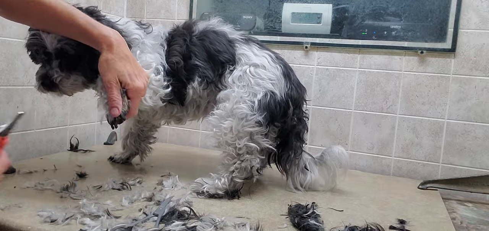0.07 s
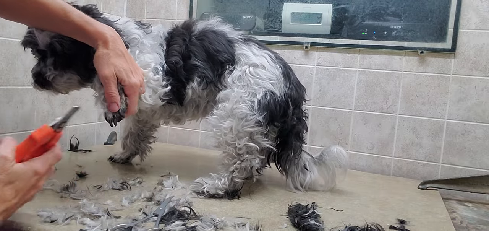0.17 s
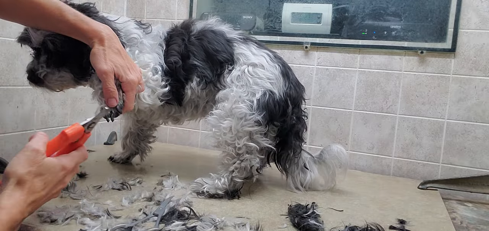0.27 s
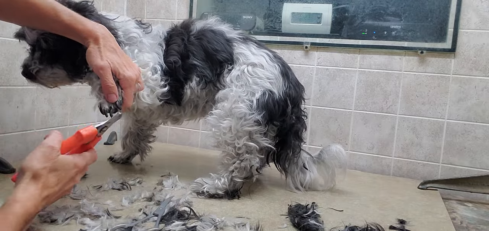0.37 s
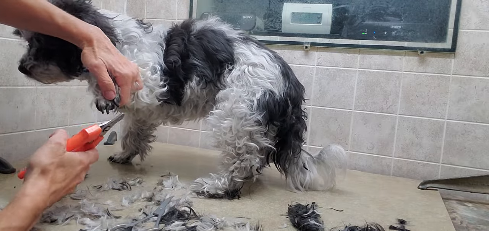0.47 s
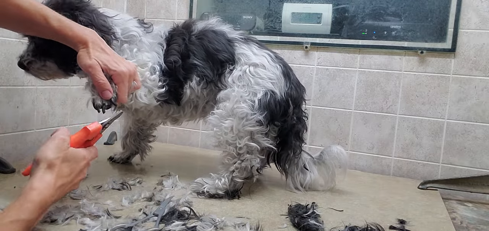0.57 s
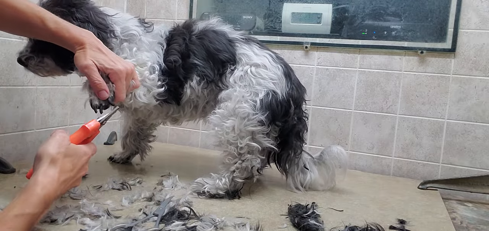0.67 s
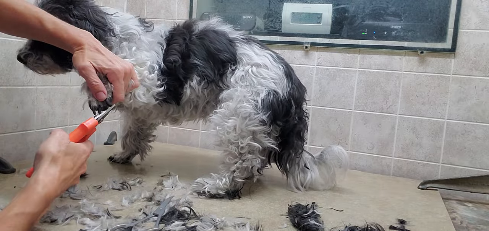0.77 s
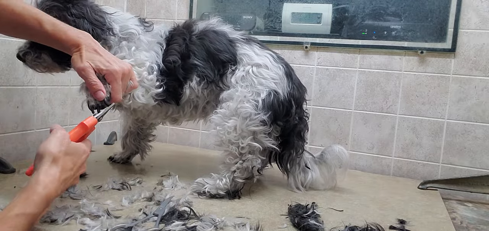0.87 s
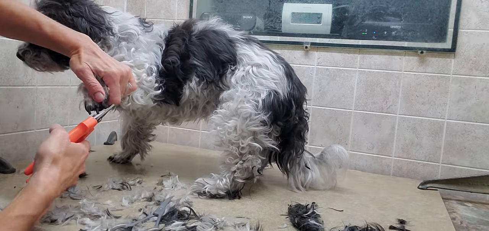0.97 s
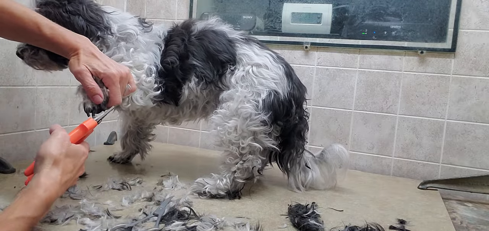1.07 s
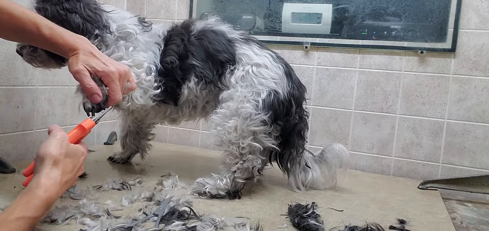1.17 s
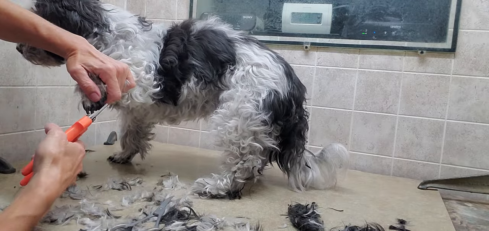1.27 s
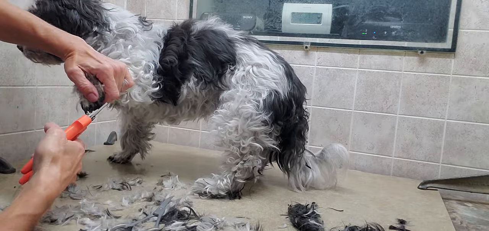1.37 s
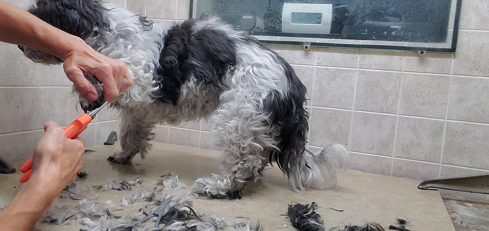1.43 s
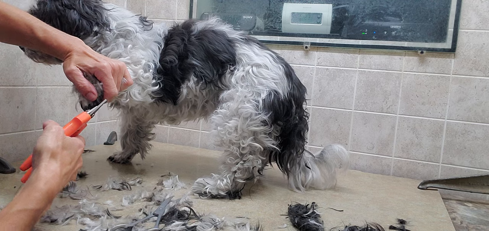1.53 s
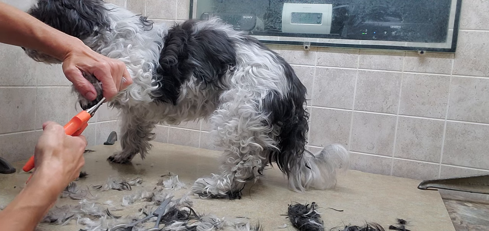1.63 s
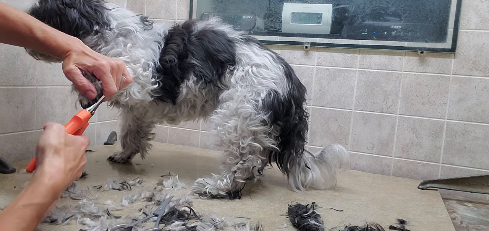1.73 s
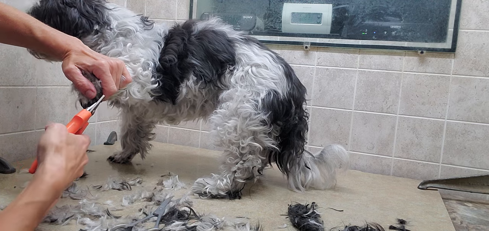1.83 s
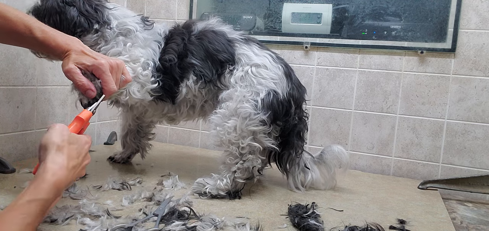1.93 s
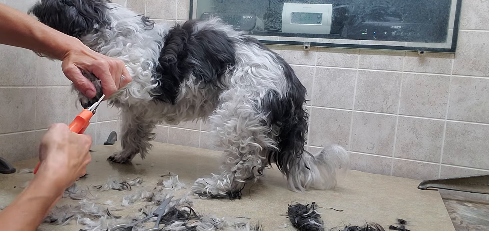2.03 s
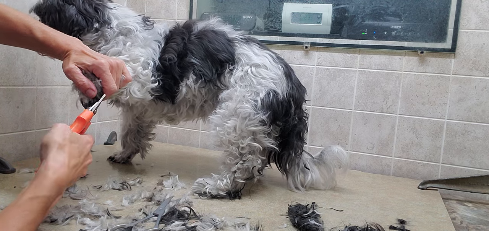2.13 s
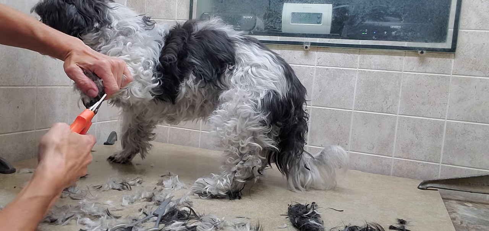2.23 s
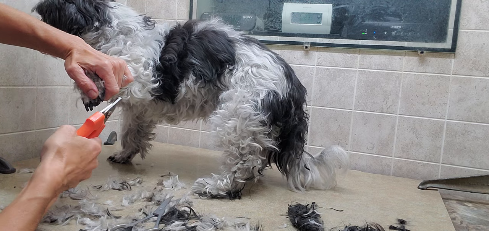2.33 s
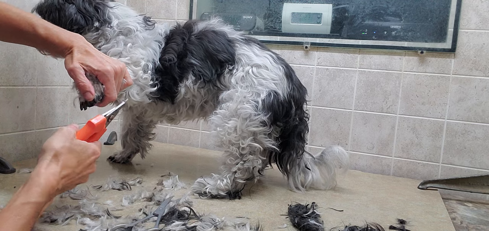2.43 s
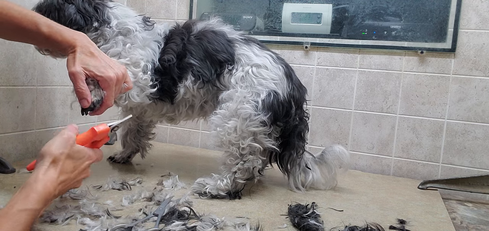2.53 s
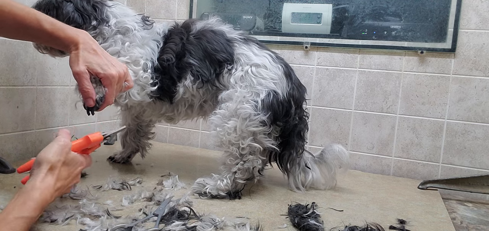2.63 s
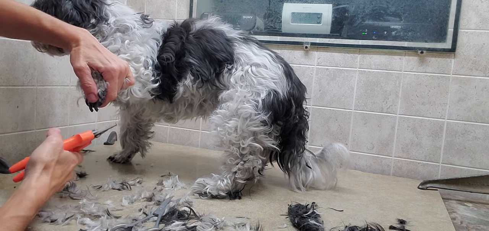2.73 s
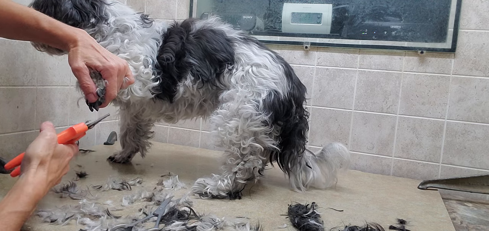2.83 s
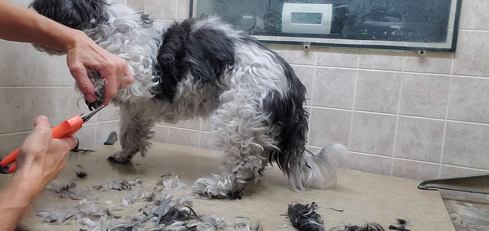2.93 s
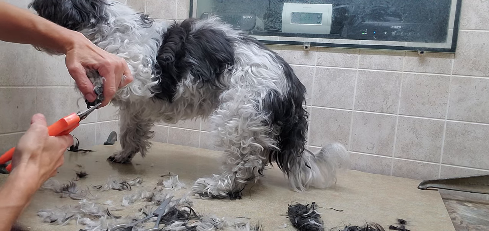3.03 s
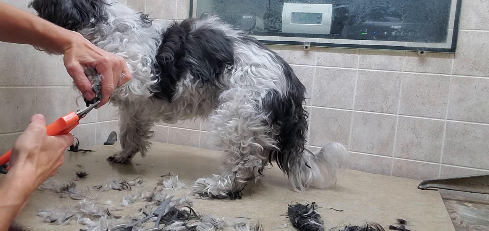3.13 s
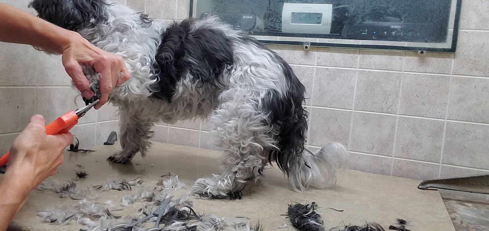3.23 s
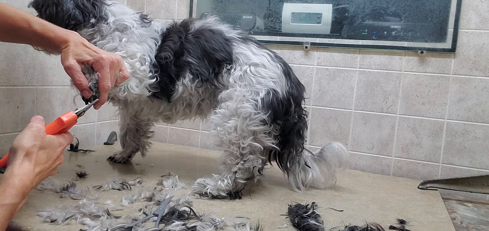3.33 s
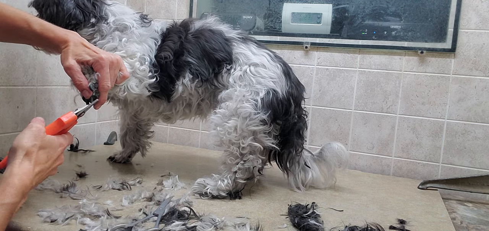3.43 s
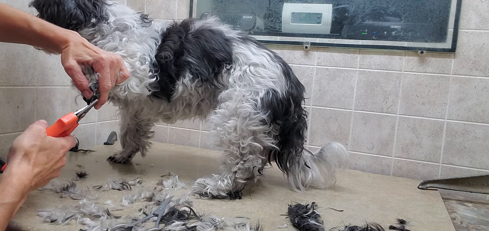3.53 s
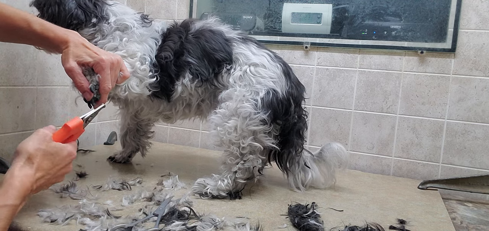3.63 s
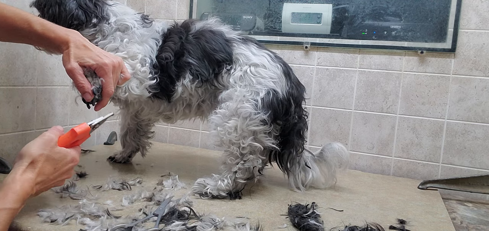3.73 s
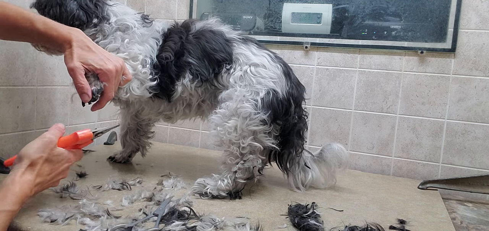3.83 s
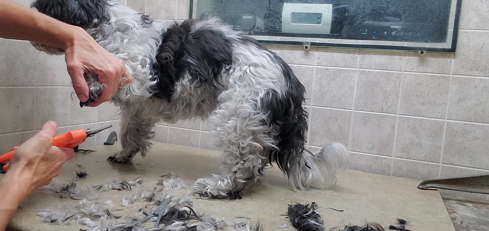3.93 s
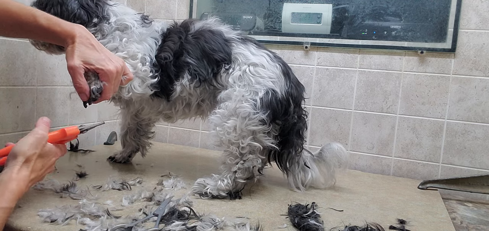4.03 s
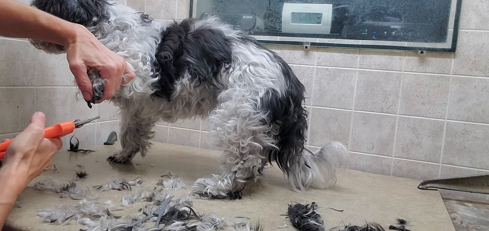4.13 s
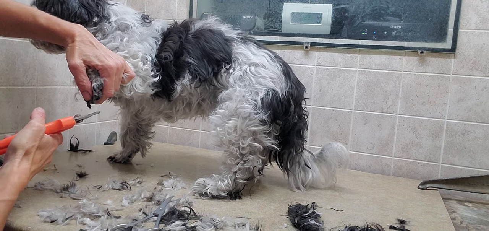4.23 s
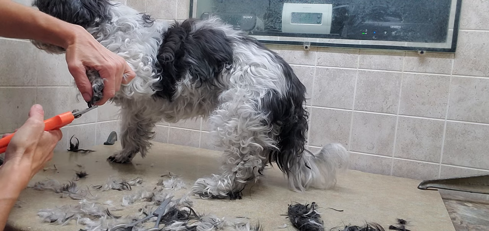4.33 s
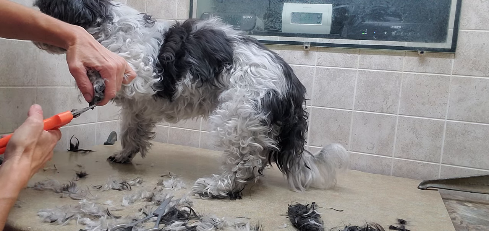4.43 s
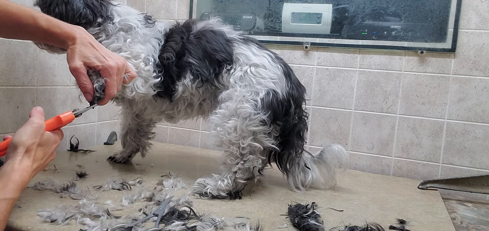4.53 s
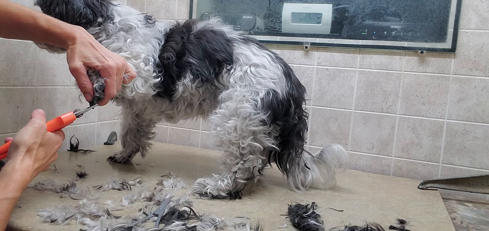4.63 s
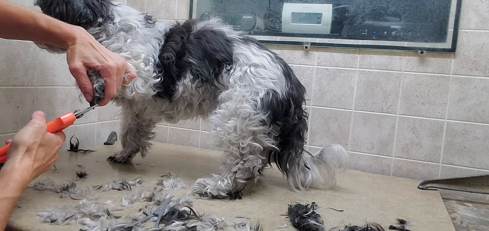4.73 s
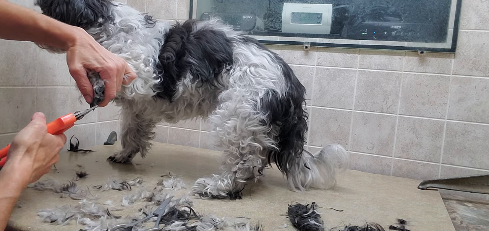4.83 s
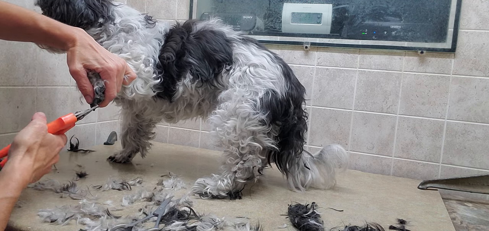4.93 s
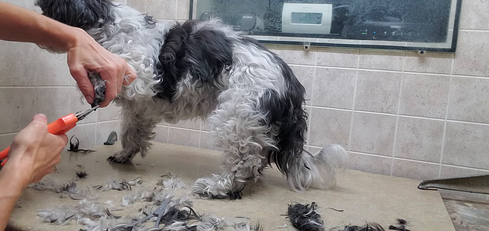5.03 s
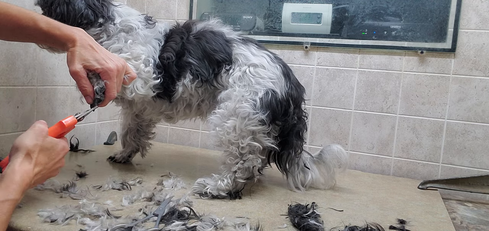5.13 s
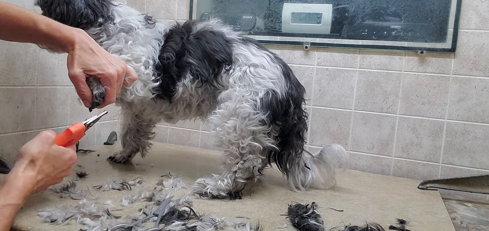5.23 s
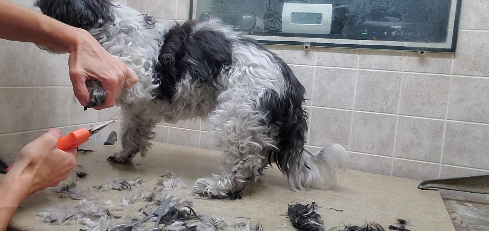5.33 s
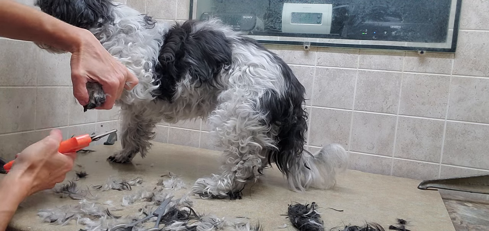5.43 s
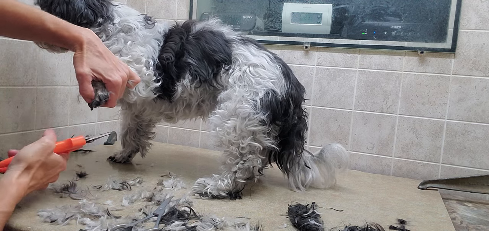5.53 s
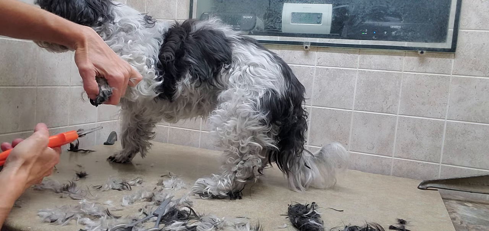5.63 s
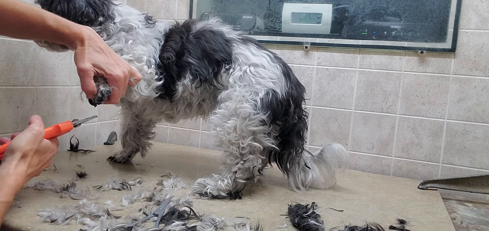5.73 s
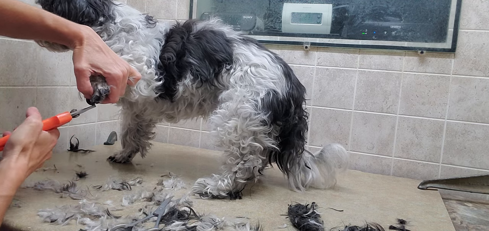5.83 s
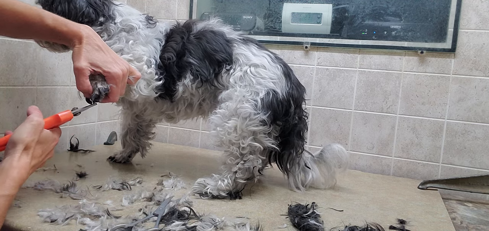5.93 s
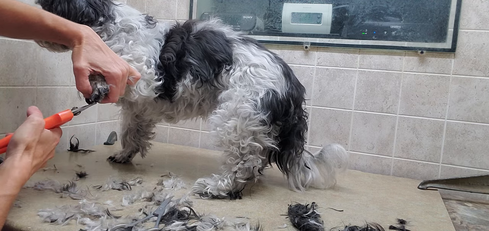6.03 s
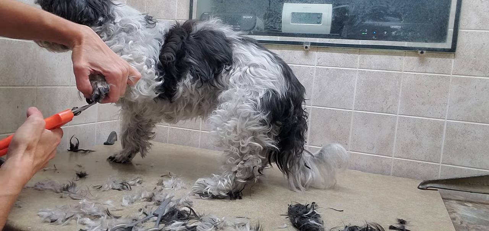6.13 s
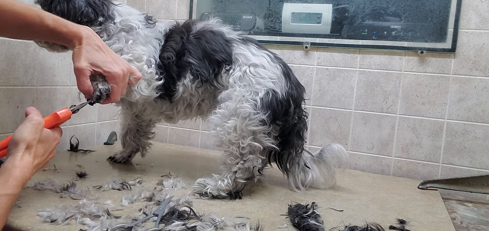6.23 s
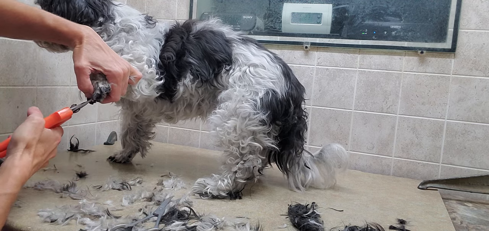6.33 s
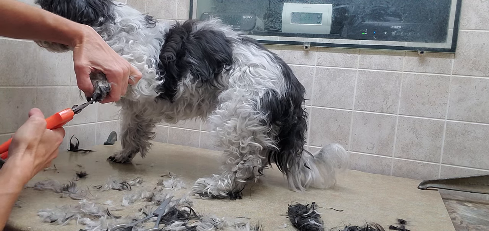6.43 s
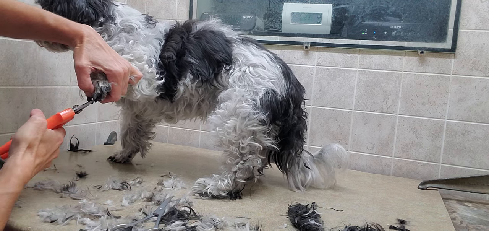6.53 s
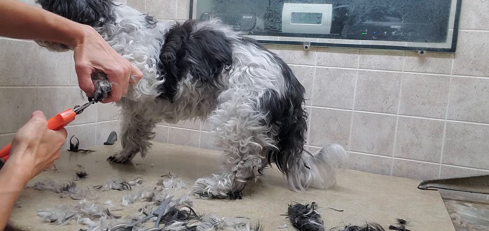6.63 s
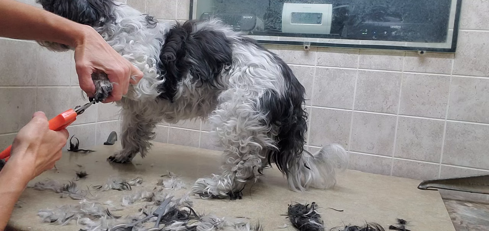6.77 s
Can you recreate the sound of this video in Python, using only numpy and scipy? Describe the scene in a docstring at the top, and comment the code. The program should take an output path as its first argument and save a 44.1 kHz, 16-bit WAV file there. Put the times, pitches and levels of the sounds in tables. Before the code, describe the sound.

A close stereo view of nail clipping in a small, hard tiled tub, with very quiet duct rumble, fan hum and thin hiss throughout; the rumble swells gently around 3.2 s. At 0.03 s there is a light metallic tap and soft fur rustle, stirring again at 0.4 s. Near-silence follows, with barely audible blade rubbing from 1 to 1.5 s and a faint paw bump at 1.24. A crisp crack at 2.32 leads to a loud snap at 2.36, a handle knock at 2.48 with faint spring ringing, then a tick and low paw bumps near 2.7. A smaller crack precedes the softer second snap at 3.68; knocks follow at 3.8-4.0, with blades sliding and fur brushing. A tiny creak swells into the brightest, loudest snap at 5.22, then a strong knock at 5.28, weaker clicks to 5.45, and ticks at 5.63, 5.7 and 5.93. Tile echoes die quickly; only ventilation remains until about 7 s.

```python
"""Plier-style clippers cut three of a small dog's nails in a tiled grooming tub, heard by two microphone ports.
Each nail creaks or cracks, then breaks in a shower of splinters, and the jaws slam shut and ring.
Handles knock, light taps and hinge ticks sound, noise rubs as blades slide, and mode clusters ring as the spring.
Every click is answered by slaps off the tiles, a dense tail and standing waves.
Behind lie low paw bumps, a hand brushing through the coat, and ventilation rumble, fan tones and hiss."""
import sys
import numpy as np
from scipy import signal
from scipy.fft import rfft, irfft, next_fast_len
from scipy.io import wavfile
from scipy.ndimage import map_coordinates

SR = 44100
rng = np.random.default_rng(int(sys.argv[2]) if len(sys.argv) > 2 else 0)


def dump_mix(stems):
    """Bounce the given channels to the path in sys.argv[1] as a 16-bit WAV at rate SR."""
    frames = np.atleast_2d(stems).T  # one column per channel
    limited = np.clip(frames, -1, 1)  # hard clip at full scale
    pcm = np.round(limited * 32767).astype(np.int16)
    wavfile.write(sys.argv[1], SR, pcm)


N = 299880  # length in samples

# Colour of the duct rumble. Each row: frequency in Hz, relative level in dB per Hz.
RUMBLE_COLOUR = [(12, -40.5), (20, -10.5), (65, 2), (83, -7.5), (101, -14.5), (153, -5.5), (187, -23.5),
                 (221, -6), (254, -17), (419, -29), (469, -24.5), (1020, -38.5), (2960, -47), (6840, -55),
                 (15800, -45.5)]
# Left-right likeness of the ventilation noise. Each row: frequency in Hz, correlation from -1 to 1.
AIR_ALIKE = [(60, 0.92), (180, 0.76), (550, 0.62), (1650, -0.03), (4970, -0.4), (15000, 0.39)]
# Fan tones. Each row: frequency in Hz, level in dB.
FAN_TONES = [(75, -73.5), (151, -79.5), (221, -84.5)]
RUMBLE_DB, RUMBLE_DRIFT_DB = -67, 0.9  # level of the duct before its swell, and its slow drift
RUMBLE_SWELL_S, RUMBLE_SWELL_WIDTH_S, RUMBLE_SWELL_DB = 3.2, 0.79, 4  # the rumble grows for a while

# Colour of the hand in the coat. Each row: frequency in Hz, relative level in dB per Hz.
RUSTLE_COLOUR = [(100, -12.5), (400, -1.5), (800, -2), (1500, -12), (4000, -15), (8000, -26), (14500, -14)]
# The hand strokes through the coat. Each row: time at the fullest in seconds, level in dB.
STROKES = [(.03, -67), (.37, -74), (1.28, -79.5), (2.699, -82), (4.1, -73)]
STROKE_RISE_DB_PER_S, STROKE_FALL_DB_PER_S = 70.5, 54  # every stroke swells and fades alike
HOLD_DB = -84.5  # the coat stirs under the resting hand

# Soft bumps of the paws on the tub floor. Each row: start in seconds, level in dB, pitch in Hz.
PAWS = [(1.24, -68, 340), (2.703, -61.5, 457), (2.722, -54, 222.4), (2.725, -65, 395), (4.016, -57, 467),
        (5.45, -70, 489.5)]

# Decay of the tub's echo. Each row: frequency in Hz, time to fall by 60 dB in seconds.
TUB_T60 = [(100, 0.45), (400, 0.31), (1500, .24), (4000, .24), (9000, .24), (15000, 0.18)]
# Left-right likeness inside the tub. Each row: frequency in Hz, correlation from -1 to 1.
TUB_ALIKE = [(100, 0.66), (300, 0.06), (600, 0.25), (2000, -0.06), (5000, 0)]
# Standing waves in the air between the walls. Each row: frequency in Hz, relative level in dB.
TUB_MODES = [(222, -6.5), (329, 1.5), (484, 2.5), (609, -3), (732, -0.5), (797, -3.5), (965, -4.5)]
# Colour of the dense tail, outweighed by standing waves in the bass. Each row: frequency in Hz, gain in dB.
TAIL_COLOUR = [(150, -4.5), (330, -8), (600, -2.5), (1200, -3)]
# Difference between the two microphone ports. Each row: frequency in Hz, left minus right in dB.
PORTS = [(200, -0.5), (550, 4), (1200, 2.5), (2500, 2), (4000, 2), (5600, 1.5), (7300, 10.5), (9300, 1.5),
         (12000, 1), (15000, 13)]
TOP_HZ = 15900  # band limit

# The return spring is set ringing. Each row: start in seconds, level in dB, pitch in Hz.
SPRING = [(2.492, -70.5, 6040), (2.67, -73, 5580), (3.91, -71.5, 6530), (4.11, -80.5, 6160),
          (5.45, -76, 6545), (5.70, -78, 5646)]
# The blades slide over each other as they are positioned or opened.
# Each row: start in seconds, length in seconds, level in dB.
BLADE_SLIDES = [(0.998, 0.51, -81), (2.598, .36, -73.5), (3.95, 0.44, -73)]
# Colour of the sliding blades. Each row: frequency in Hz, relative level in dB per Hz.
SLIDE_COLOUR = [(1000, -17), (3500, -5), (6300, -2.5), (8500, -11), (11000, -1), (14500, -1.5)]

# Light taps and hinge ticks of the clippers.
# Each row: start in seconds, level in dB, treble in dB, left minus right in dB.
TICKS = [(.029, -47.5, 7, 0.5), (2.668, -61.5, 2, 5), (3.045, -72.5, 10, 1), (4.167, -67, 21, 3),
         (4.396, -73.5, 15, 7), (5.628, -50.5, 9.5, 2.5), (5.70, -57.5, 3, 5.5), (5.932, -69.5, 9, -2)]
# Colour of the taps and ticks. Each row: frequency in Hz, relative level in dB per Hz.
TICK_COLOUR = [(100, -17), (1000, -16), (1900, -9.5), (3000, -5.5), (4700, -2.5), (6600, -14.5), (9000, -9),
               (11000, -10), (13300, -10), (15500, -9.5)]
# The handles knock as the grip loosens.
# Each row: start in seconds, level in dB, treble in dB, left minus right in dB.
HANDLES = [(2.4825, -36.5, -4, 2), (3.797, -41, -3.5, 1), (3.909, -49, -1.5, 4), (3.985, -55.5, -1, 3),
           (4.11, -72.5, -17, 16), (5.279, -31.5, -0.5, 1.5), (5.388, -59.5, -20, 0.5),
           (5.449, -57, -8, 3.5)]
# Colour of the handles. Each row: frequency in Hz, relative level in dB per Hz.
HANDLE_COLOUR = [(100, -9), (1200, -8), (2100, 1), (4000, -0.5), (5700, -5), (7500, -14), (11000, -4),
                 (13000, -4), (14500, 4)]

# The nail cracks under the closing blades.
# Each row: start in seconds, level in dB, treble in dB, left minus right in dB.
CRACKS = [(2.270, -58, -0.5, 1), (2.3228, -34.5, 2.5, 2), (3.628, -58, -2, -0.5), (3.6445, -41.5, 0.5, -1),
          (5.115, -78, 5, 0)]
# Colour of a small crack. Each row: frequency in Hz, relative level in dB per Hz.
CRACK_COLOUR = [(100, -16.5), (1400, -18), (2000, -6.5), (3000, -11.5), (3900, 2), (5200, -2), (6400, -3.5),
                (8200, -16), (10200, 0.5), (12000, -3.5), (15000, -0.5)]
SQUEEZE_S, CREAK_DB, CREAK_POWER = 0.12, -50, 2.4  # last nail's creak: length, final level, growth with force

# The nail gives way. Each row: start in seconds, level in dB, treble in dB, time until the jaws meet in seconds,
# jaw blow relative to the break in dB, left minus right in dB, nail's pitch in Hz, low-mid gain in dB.
CUTS = [(2.3602, -21, -1.5, 0.0049, -7, 0, 4950, 0), (3.6821, -25.5, -.5, .0045, 3, 0, 1850, -1.5),
        (5.223, -19, 3, .0045, 0, 0.5, 5700, 0)]
# Colour of the breaking nail. Each row: frequency in Hz, relative level in dB per Hz.
SNAP_COLOUR = [(50, -8), (150, -15.5), (300, -9), (550, -4.5), (1200, -9.5), (1900, -5), (3000, -2.5),
               (4000, 1.5), (5700, -2.5), (7000, -9.5), (8200, -12), (9700, -6.5), (13000, -4),
               (15500, -2.5)]
# Ringing of the steel jaws. Each row: frequency in Hz, relative level in dB.
JAW_MODES = [(1830, -2), (1880, -3.5), (2048, -2), (2444, -3.5), (2730, -3), (3790, 0.5), (3838, -0.5),
             (3940, 1), (4840, -1.5), (5010, -4), (5200, -4.5), (5285, -1.5), (5645, 0.5), (14465, 0)]
NAIL_DB, NAIL_OCTAVES = 3.5, 0.11  # height and width of a nail's own resonance
LOW_MID_HZ, LOW_MID_OCTAVES = 501.6, 0.43  # centre and width of the low-mid band


def amp(db):
    """Decibels to gain."""
    return 10 ** (np.asarray(db) / 20)


def unit(x):
    """Scale to rms 1."""
    return x / np.sqrt(np.mean(x ** 2) + 1e-20)


def along(points, hz):
    """Interpolate (Hz, value) points on a log frequency axis."""
    f, v = np.transpose(points)
    return np.interp(np.log(hz + 1), np.log(f + 1), v)


def hump(hz, centre_hz, octaves):
    """A bell of height 1 on a log frequency axis."""
    return np.exp(-.5 * (np.log2((hz + 1) / centre_hz) / octaves) ** 2)


def wobble(rate):
    """A smooth random curve, rate knots a second."""
    knots = rng.standard_normal(int(N * rate / SR) + 4)
    return map_coordinates(knots, [np.arange(N) * rate / SR])


def filtered(x, gain):
    """x through the causal minimum-phase filter with this gain over frequency."""
    n = x.shape[-1]
    m = 2 * next_fast_len(n // 2 + 4096)
    cepstrum = irfft(np.log(np.maximum(gain(np.fft.rfftfreq(m, 1 / SR)), 1e-6)))
    # folding the cepstrum onto positive time makes the filter causal
    cepstrum[..., 1:m // 2] *= 2
    cepstrum[..., m // 2 + 1:] = 0
    return irfft(rfft(x, m) * np.exp(rfft(cepstrum)))[..., :n]


def paired(x, alike):
    """Two unrelated noises become left and right with the given likeness."""
    n = x.shape[1]
    likeness = np.clip(along(alike, np.fft.rfftfreq(n, 1 / SR)), -1, 1)
    turn = np.arccos(likeness) / 2
    mid, side = irfft(rfft(x) * [np.cos(turn), np.sin(turn)], n)
    return np.array([mid + side, mid - side])


def rush(spectrum, alike):
    """Coloured stereo noise of rms 1."""
    noise = paired(rng.standard_normal((2, N)), alike)
    return unit(filtered(noise, lambda hz: amp(along(spectrum, hz))))


def add(track, s, sound):
    """Mix a sound into the track at time s."""
    part = track[:, max(round(s * SR), 0):][:, :sound.shape[-1]]
    part += sound[..., :part.shape[1]]


def coloured(x, spectrum, treble_db, pan_db):
    """The colour of the sounding part, of the contact's hardness and of each microphone port."""
    def gain(hz):
        treble = along([(5000, 0.0012), (13000, treble_db)], hz)
        tone = along(spectrum, hz) + treble
        left_right = np.outer([1, -1], along(PORTS, hz) + pan_db) / 2
        return amp(tone + left_right)

    return filtered(x, gain)


def blow(sound, db, length_s=0.024):
    """Scale a blow to the energy of length_s at this level."""
    return amp(db) * unit(sound) * np.sqrt(length_s * SR / sound.shape[1])


def modes(table):
    """Sines dying with the tub's echo, with a random starting phase and a port-to-port gap set by its likeness."""
    t, ring = np.arange(SR // 2) / SR, 0
    for hz, db in table:
        # only the sign of the gap is drawn
        apart = np.arccos(np.clip(along(TUB_ALIKE, hz), -1, 1)) * rng.choice([-1, 1])
        phase = 2 * np.pi * rng.random() + np.array([[0], [apart]])
        envelope = amp(db - 60 * t / along(TUB_T60, hz))
        ring = ring + envelope * np.sin(2 * np.pi * hz * t + phase)
    return ring / np.linalg.norm(ring[0])  # unit energy on the left


def ringing(rows, width_hz, t60, rise_s, alike):
    """Clusters of close modes, made as narrow-band noise, that swell and die away for each (s, dB, Hz) row."""
    out, t = np.zeros((2, N)), np.arange(SR) / SR
    envelope = amp(-60 * t / t60) * (1 - np.exp(-t / rise_s))
    for s, db, f in rows:
        noise = paired(rng.standard_normal((2, SR)), alike)
        cluster = filtered(noise, lambda hz: 1 / (1 + (2 * (hz - f) / width_hz) ** 2))
        add(out, s, amp(db) * unit(cluster) * envelope)
    return out


def tub(direct_db=-9, walls_db=-6, walls_s=0.019, build_s=0.002, modes_db=-16):
    """Answer to one contact: direct sound, slaps off the near tiles, a dense tail and the standing waves."""
    # the dense tail is noise in which each frequency fades at its own rate
    hz, frames, z = signal.stft(paired(rng.standard_normal((2, SR // 2)), TUB_ALIKE), SR, nperseg=256)
    fade_db = along(TAIL_COLOUR, hz)[:, None] - 60 * frames / along(TUB_T60, hz)[:, None]
    t = np.arange(SR // 2) / SR
    tail = signal.istft(z * amp(fade_db), SR, nperseg=256)[1][:, :len(t)]
    tail = tail * (1 - np.exp(-t / build_s))
    direct = rng.standard_normal(tail.shape) * np.exp(-t / .0004)
    sparse = rng.standard_normal(tail.shape) * (rng.random(tail.shape) < .015)
    slaps = paired(sparse * np.exp(-t / walls_s), TUB_ALIKE)
    paths = [(direct, direct_db), (slaps, walls_db), (tail, 0), (modes(TUB_MODES), modes_db)]
    return sum(amp(db) * path / np.linalg.norm(path) for path, db in paths) * np.sqrt(2)


def ventilation(hiss_db=-84):
    """Duct rumble that drifts and swells once, wavering fan tones and a thin steady hiss."""
    t = np.arange(N) / SR
    hum = 0
    for hz, db in FAN_TONES:
        level = amp(db + 0.48 * wobble(7.2)) * np.sqrt(2)
        hum = hum + level * np.sin(2 * np.pi * hz * t + 2.9 * wobble(2))
    hiss = rush([(300, 2), (1200, -7.0), (2700, -0.5), (7000, -15.5), (15000, -15.5)], AIR_ALIKE)
    swell = np.exp(-.5 * ((t - RUMBLE_SWELL_S) / RUMBLE_SWELL_WIDTH_S) ** 2)
    rumble_db = RUMBLE_DB + RUMBLE_SWELL_DB * swell + RUMBLE_DRIFT_DB * wobble(1.4)
    rumble = amp(rumble_db) * rush(RUMBLE_COLOUR, AIR_ALIKE)
    return rumble + hum + amp(hiss_db) * hiss


def fur(uneven_db=2.0):
    """The hand rests on the coat and brushes unevenly through it whenever it shifts its grip."""
    t, power = np.arange(N) / SR, amp(HOLD_DB) ** 2
    for s, db in STROKES:
        drop_db = np.maximum(STROKE_RISE_DB_PER_S * (s - t), STROKE_FALL_DB_PER_S * (t - s))
        power = power + amp(db - drop_db) ** 2
    return np.sqrt(power) * amp(uneven_db * wobble(25)) * rush(RUSTLE_COLOUR, TUB_ALIKE)


def bumps(t60=0.15, rise_s=0.0067, dull_db=-6):
    """Each paw bump rings one low resonance of the tub inside a dull thud."""
    out, t = np.zeros((2, N)), np.arange(SR // 2) / SR
    for s, db, hz in PAWS:
        envelope = amp(db - 60 * t / t60) * (1 - np.exp(-t / rise_s))
        add(out, s, envelope * np.sin(2 * np.pi * hz * t))
    thud = ringing(PAWS, width_hz=230, t60=t60, rise_s=rise_s, alike=TUB_ALIKE)
    return out + amp(dull_db) * thud


def spring(overtones=((1, 0), (1.7, -8), (2.25, -8))):
    """The coil sings in three clusters of modes, each overtone a (multiple, dB) pair."""
    rows = [(s, db + level, hz * ratio) for s, db, hz in SPRING for ratio, level in overtones]
    return ringing(rows, width_hz=750, t60=.75, rise_s=.02, alike=TUB_ALIKE)


def slide(rough_db=-1.5, pan_db=3):
    """Steel rubs on steel as uneven noise, loudest in the middle of the movement."""
    t = np.arange(N) / SR
    speed = 0
    for s, length, db in BLADE_SLIDES:
        speed = speed + amp(db) * np.sin(np.pi * np.clip((t - s) / length, 0, 1))
    roughness = amp(rough_db * wobble(40))
    return speed * roughness * unit(coloured(rng.standard_normal((2, N)), SLIDE_COLOUR, 0, pan_db))


def clicks(rows, spectrum, contact_s, contact_db):
    """Clicks with the tub's answer; the handles add an audible gritty chatter, the hinge practically none."""
    out, t = np.zeros((2, N)), np.arange(SR // 2) / SR
    for s, db, treble_db, pan_db in rows:
        chatter = rng.standard_normal((2, len(t))) * np.exp(-t / contact_s)
        sound = tub() + amp(contact_db) * chatter / np.linalg.norm(chatter[0])
        add(out, s, blow(coloured(sound, spectrum, treble_db, pan_db), db))
    return out


def creak(slips_hz=1800, treble_db=0):
    """Tiny slips swell as the force on the last nail rises steadily, and stop when it breaks."""
    slips = rng.standard_normal(N) * (rng.random(N) < slips_hz / SR)
    remaining_s = CUTS[-1][0] - np.arange(N) / SR
    force = np.clip(1 - remaining_s / SQUEEZE_S, 0, 1) * (remaining_s > 0)
    rasp = amp(CREAK_DB) * force ** CREAK_POWER * unit(slips)
    answer = coloured(tub(), CRACK_COLOUR, treble_db, 0)
    return signal.fftconvolve(rasp[None], answer / np.linalg.norm(answer[0]), axes=1)[:, :N]


def cuts(splinter_db=-9, splinter_s=0.0097, steel_db=-10.0):
    """The nail breaks in a shower of splinters, each nail with its own colour; then the jaws meet and ring."""
    out, t = np.zeros((2, N)), np.arange(SR // 20) / SR
    for s, db, treble_db, gap_s, jaw_db, pan_db, nail_hz, low_mid_db in CUTS:
        splinters = rng.standard_normal(len(t)) * (rng.random(len(t)) < .03) * np.exp(-t / splinter_s)
        splinters *= amp(splinter_db) / np.linalg.norm(splinters)
        splinters[0] += 1  # the break itself
        fracture = signal.fftconvolve(tub(), splinters[None], axes=1)
        jaws = tub() + amp(steel_db) * modes(JAW_MODES)

        def toe(hz):
            nail = NAIL_DB * hump(hz, nail_hz, NAIL_OCTAVES)
            low_mid = low_mid_db * hump(hz, LOW_MID_HZ, LOW_MID_OCTAVES)
            return amp(nail + low_mid)

        snap = coloured(filtered(fracture, toe), SNAP_COLOUR, treble_db, pan_db)
        slam = coloured(filtered(jaws, toe), SNAP_COLOUR, treble_db, pan_db)
        add(out, s, blow(snap, db))
        add(out, s + gap_s, blow(slam, db + jaw_db))
    return out


def scene():
    """Clippers, dog and room."""
    nails = cuts() + creak() + clicks(CRACKS, CRACK_COLOUR, contact_s=0.00061, contact_db=-14)
    handles = clicks(HANDLES, HANDLE_COLOUR, contact_s=0.0096, contact_db=-2.5)
    ticks = clicks(TICKS, TICK_COLOUR, contact_s=0.0064, contact_db=-57)
    return nails + handles + ticks + spring() + bumps() + fur() + ventilation() + slide()


def record(dry):
    """A steep low-pass keeps almost nothing above the band limit."""
    return signal.sosfilt(signal.ellip(12, .1, 80, TOP_HZ, fs=SR, output="sos"), dry)


dry = scene()
out = record(dry)
dump_mix(out)
```